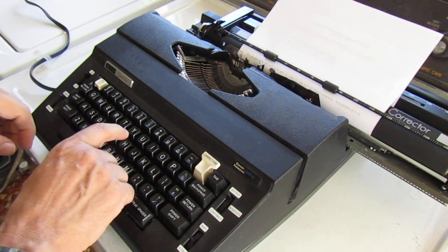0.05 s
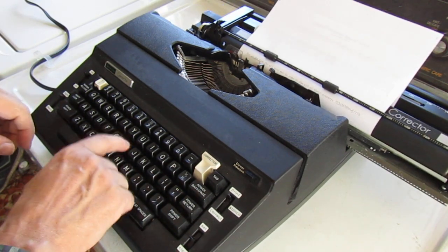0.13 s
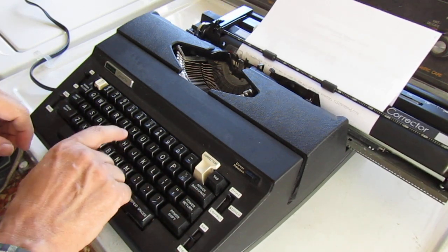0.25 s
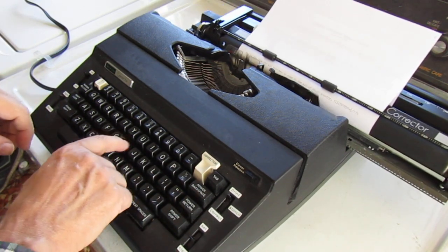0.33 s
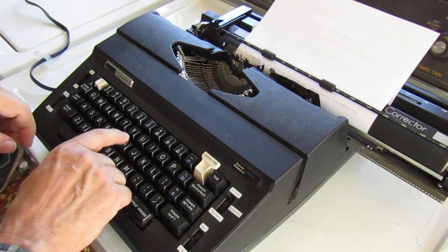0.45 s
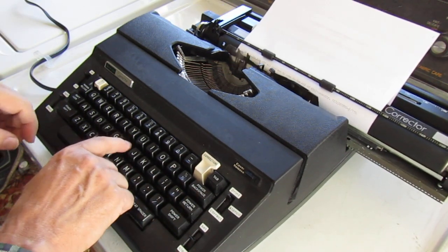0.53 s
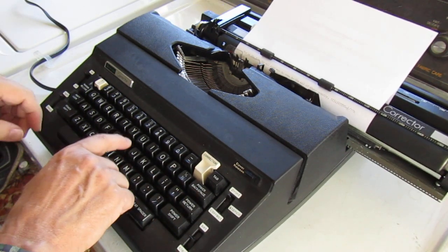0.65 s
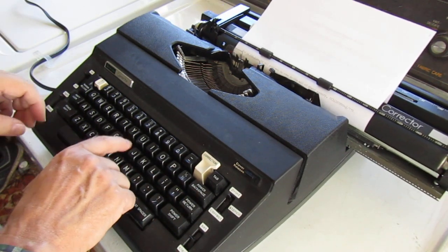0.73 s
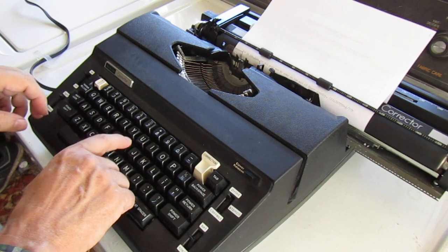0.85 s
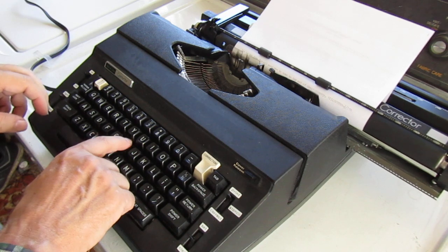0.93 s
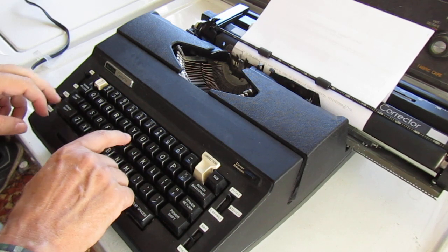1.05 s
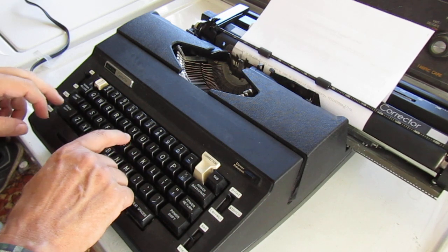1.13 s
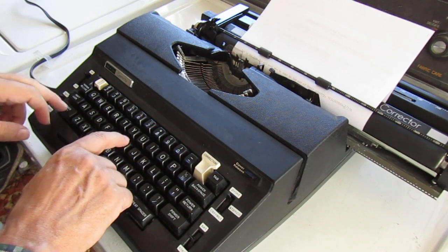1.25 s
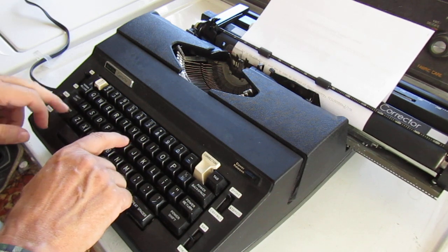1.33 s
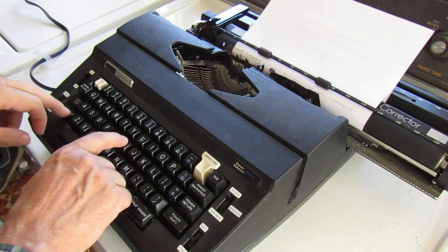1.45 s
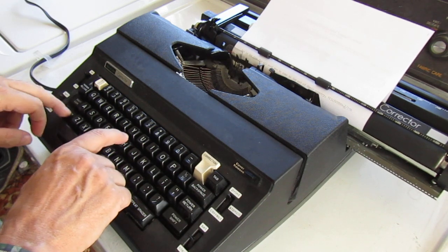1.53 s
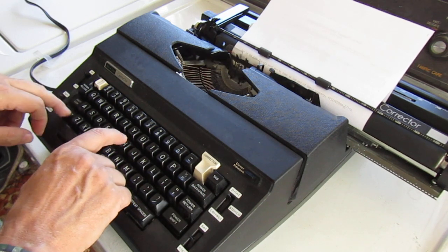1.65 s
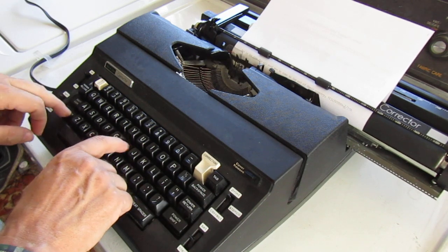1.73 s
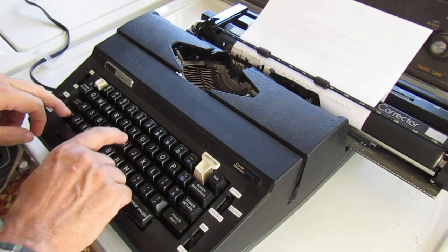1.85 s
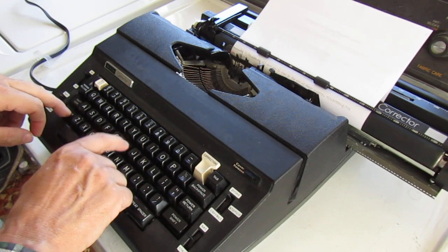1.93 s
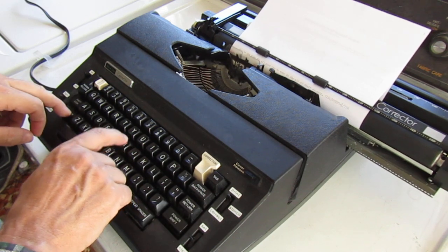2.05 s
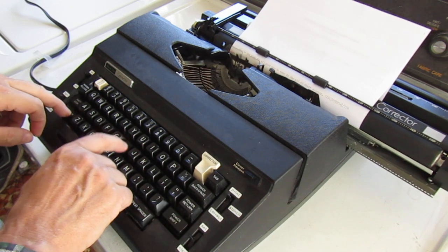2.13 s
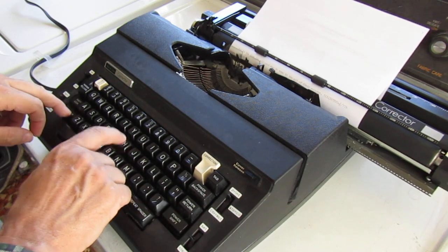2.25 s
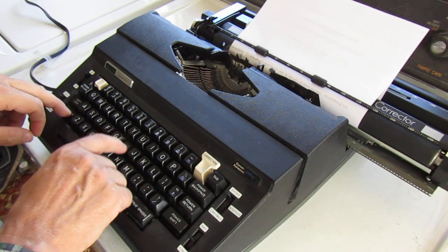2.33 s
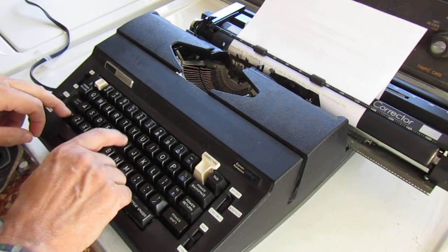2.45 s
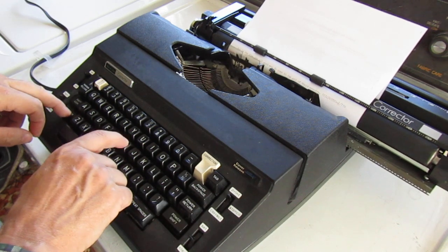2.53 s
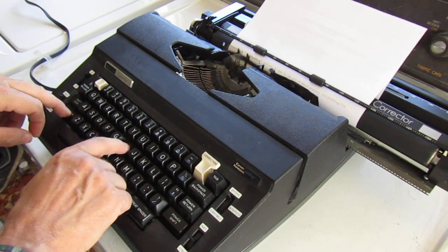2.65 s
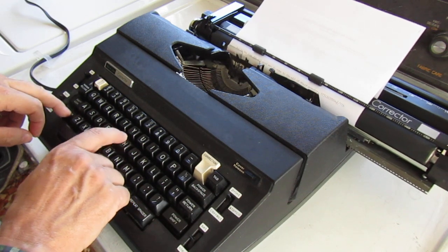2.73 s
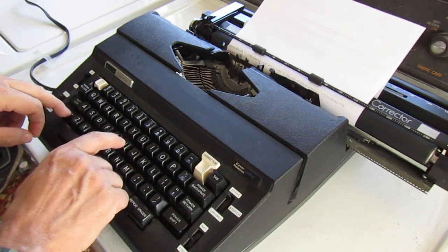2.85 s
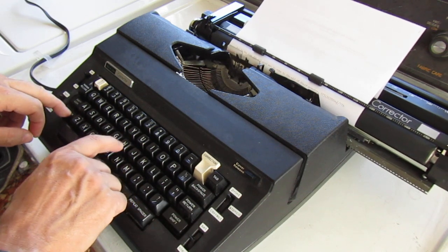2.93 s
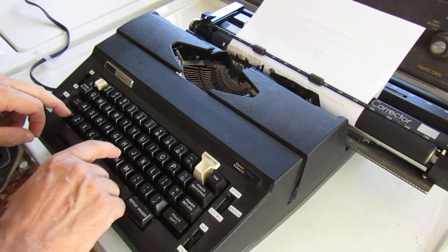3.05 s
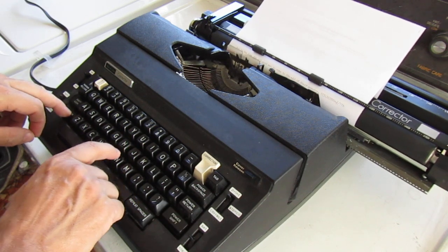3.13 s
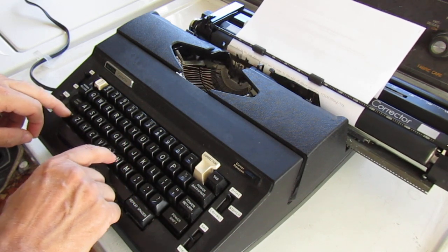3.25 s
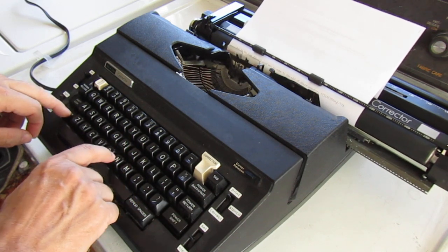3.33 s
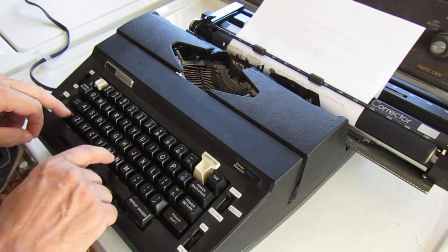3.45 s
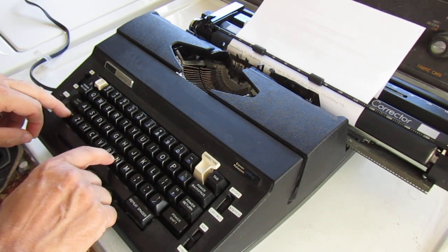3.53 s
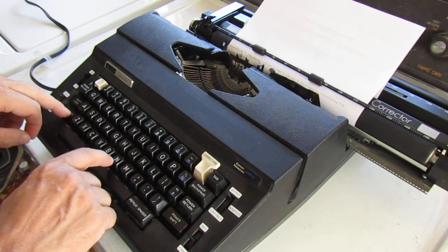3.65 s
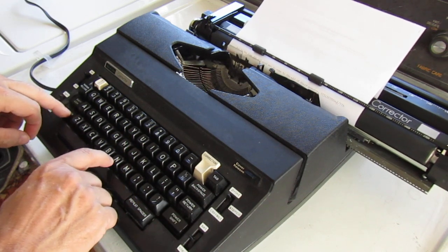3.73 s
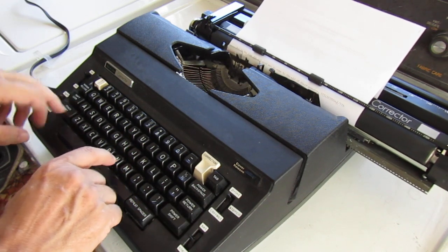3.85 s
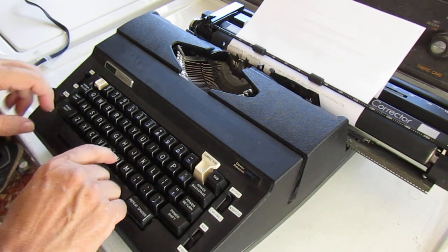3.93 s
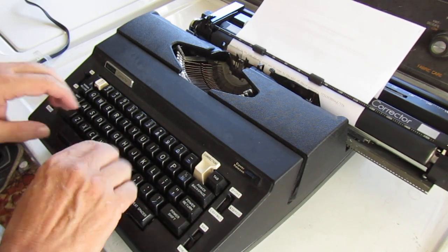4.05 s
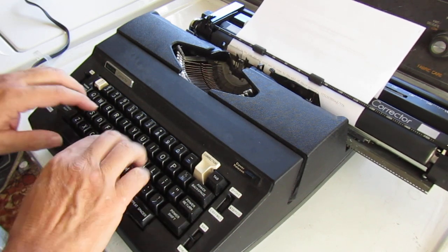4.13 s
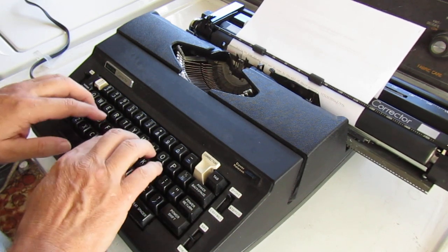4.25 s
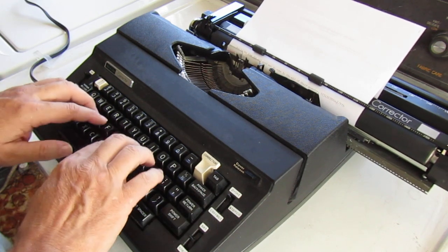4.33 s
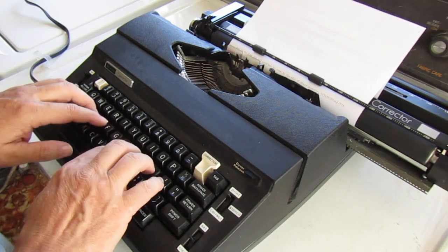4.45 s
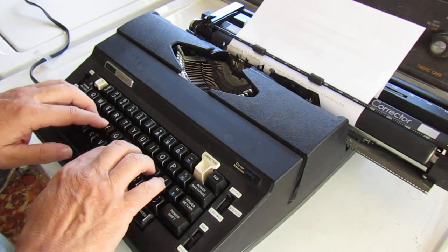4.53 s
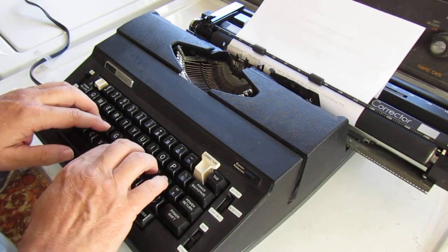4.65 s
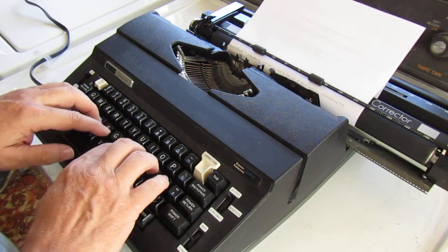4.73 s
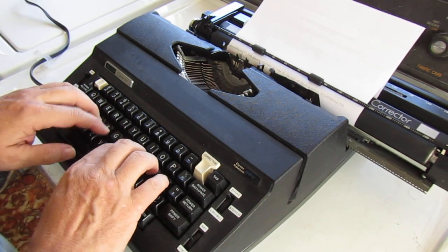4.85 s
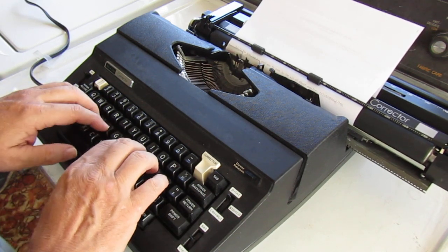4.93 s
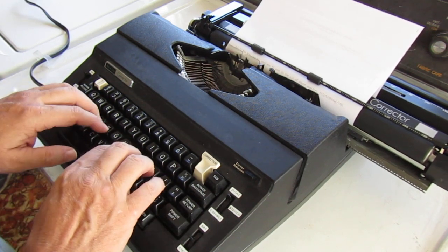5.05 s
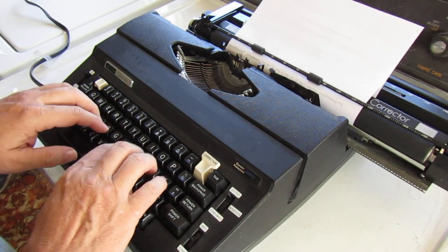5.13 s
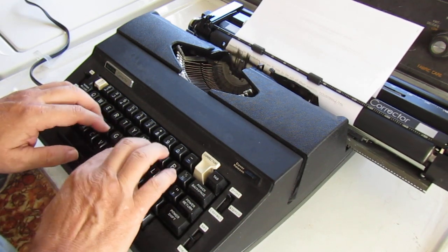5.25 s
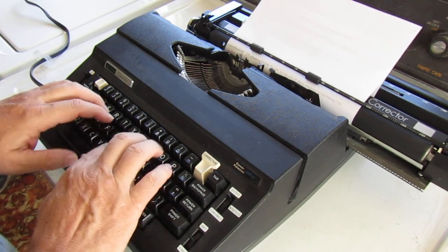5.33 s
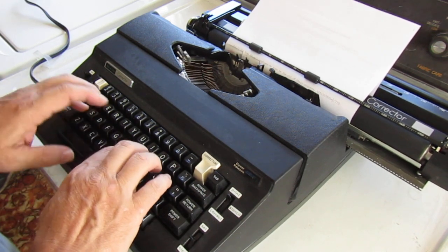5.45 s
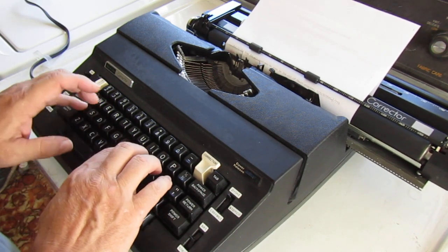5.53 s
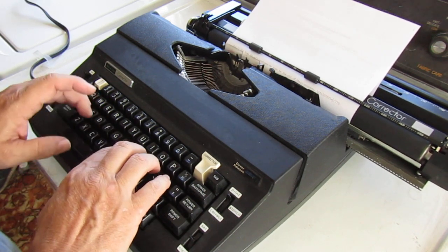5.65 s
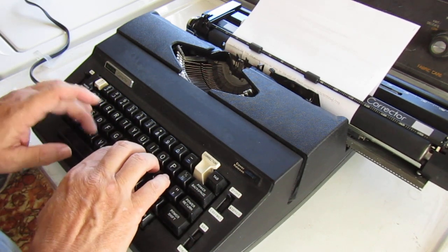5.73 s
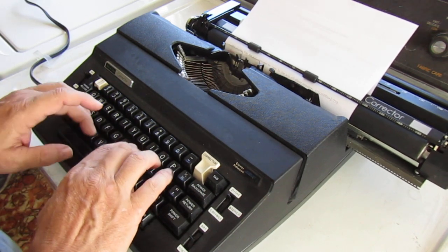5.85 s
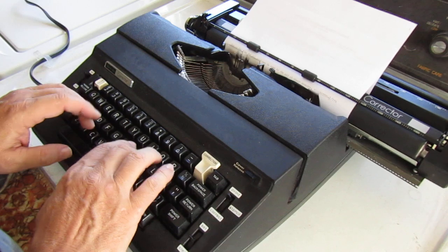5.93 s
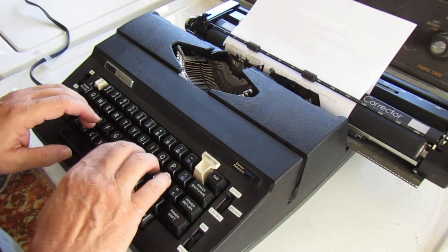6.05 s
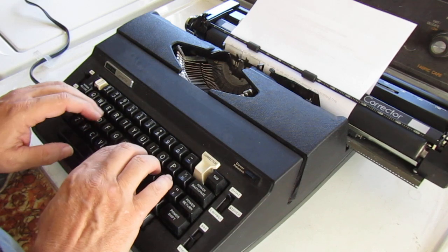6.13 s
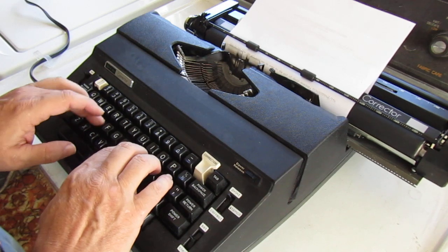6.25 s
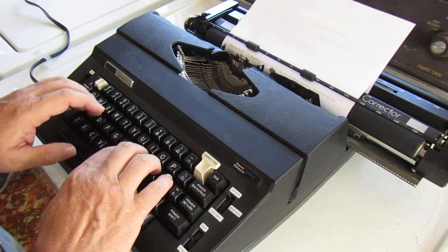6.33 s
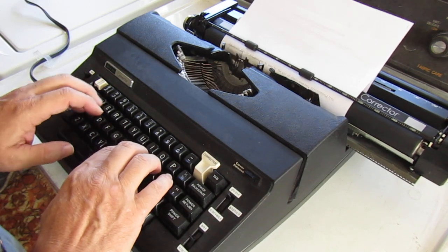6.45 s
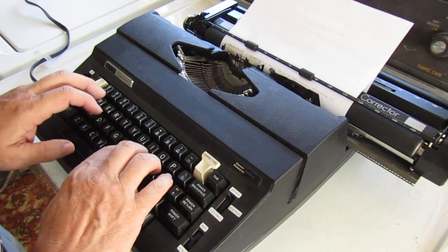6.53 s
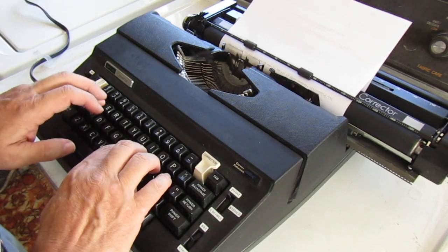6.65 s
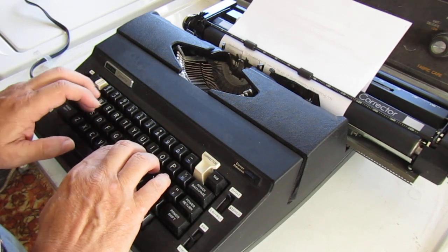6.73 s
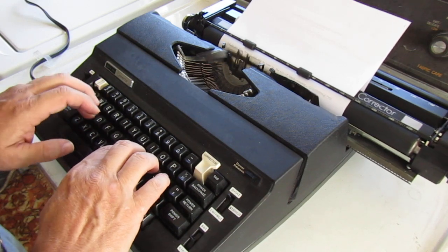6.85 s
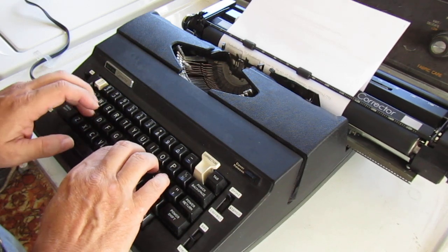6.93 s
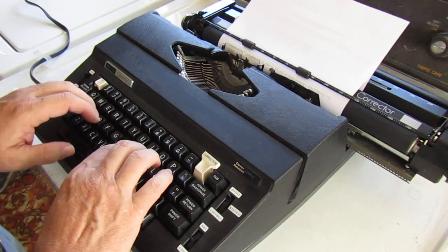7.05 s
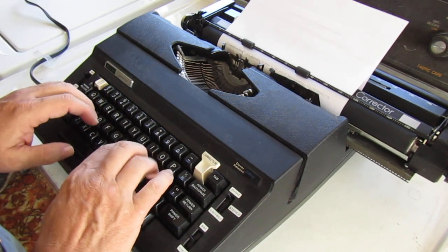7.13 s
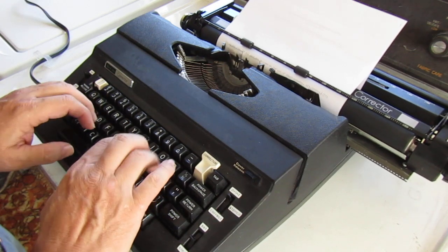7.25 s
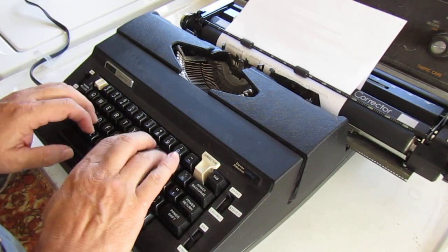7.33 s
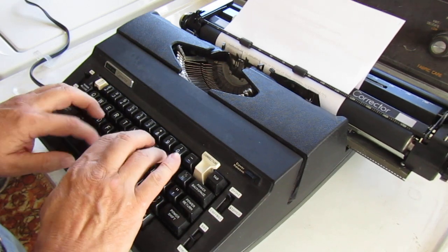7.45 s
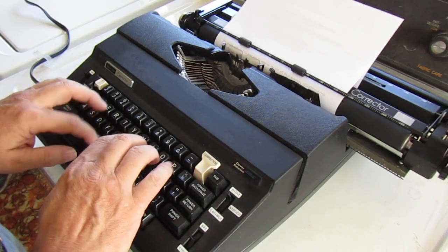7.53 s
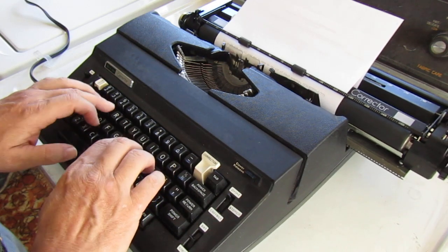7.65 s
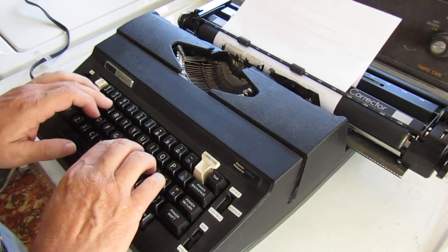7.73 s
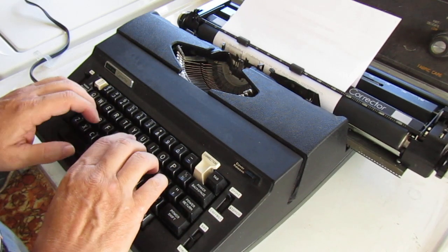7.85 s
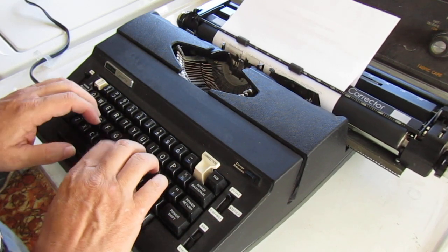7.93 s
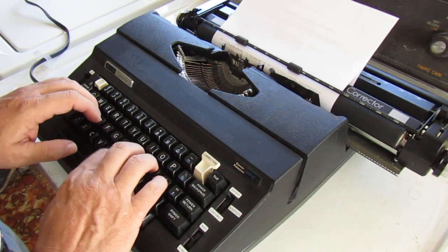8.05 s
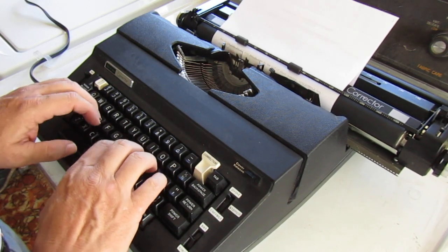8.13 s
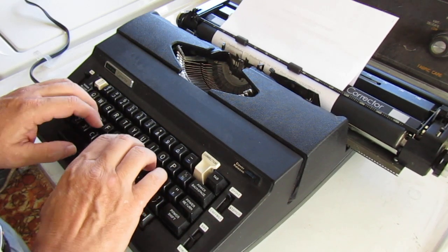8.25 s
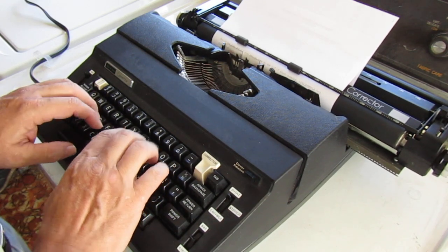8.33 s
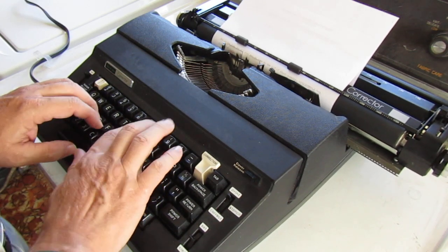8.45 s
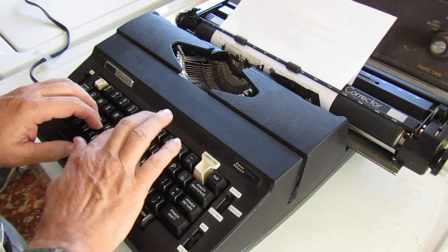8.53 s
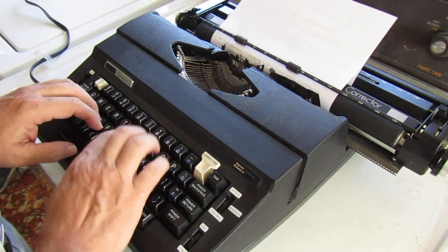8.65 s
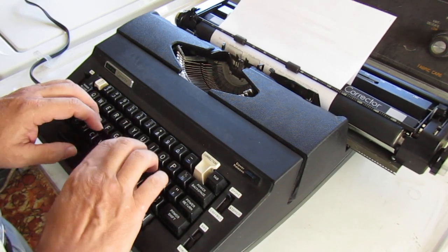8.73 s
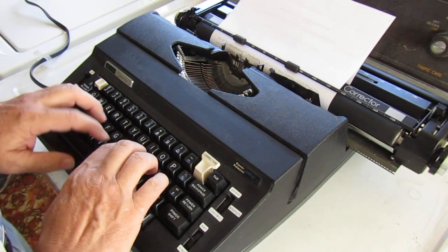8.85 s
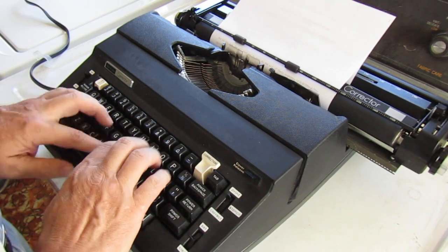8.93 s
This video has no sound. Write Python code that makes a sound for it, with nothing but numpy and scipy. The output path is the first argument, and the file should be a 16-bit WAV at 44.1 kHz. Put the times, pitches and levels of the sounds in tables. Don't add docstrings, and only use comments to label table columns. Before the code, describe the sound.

Bright, cracking type-bar slaps against a rubber roller dominate, recorded very near with a short dull room tail. Two groups of five even strokes come first, separated by light clunks; then a pause where a low motor hum and whir swells, with shift levers clicking. Faster, uneven typing follows, mixed with softer space-bar knocks, ending on small clicks. Hum ducks under the typing.

```python
import sys
import numpy as np
from scipy import signal
from scipy.fft import rfft, irfft
from scipy.io import wavfile
from scipy.ndimage import uniform_filter1d

SR = 44100
rng = np.random.default_rng(int(sys.argv[2]) if len(sys.argv) > 2 else 0)


def amplitude_ratio(level_db):
    exponent = np.asarray(level_db, float) / 20
    return 10 ** exponent


def store_pcm(level_fs):
    pcm = np.round(np.clip(level_fs, -1, 1) * 32767).astype(np.int16)
    wavfile.write(sys.argv[1], SR, np.atleast_2d(pcm).T)


N = 396900

# start in seconds, slap peak in dB, bite near 5.5 kHz in dB,
# edge near 9 kHz in dB, table thud in dB
STRIKES = [(0.2235, 6, 1.5, -1, -37.5), (0.411, 1.5, 5.5, -2.5, -40.5), (0.5967, -0.8, 4, -1, -45),
           (0.7569, -1, 2, 1.5, -43), (0.9694, -1.75, 2.5, 3, -42.5), (1.8219, 1, -4, 5.5, -44),
           (2.037, -2.5, -0.5, 5.5, -47.5), (2.2264, -3, -10, 7, -44.5), (2.4414, -2.5, 1, 6, -42),
           (2.71, -2.5, 1, 4.5, -44.5), (5.3234, 2, -1, -4.5, -39), (5.4305, -3, -1, -6.5, -42),
           (5.8553, -0.2, 3, -3, -40.5), (5.9603, -3.5, 5.5, -2.5, -46.5), (6.285, -3.5, 7, -3, -41.5),
           (6.4658, -4, 0.5, -1.5, -44.5), (6.681, -5.5, 1.5, -7, -40.5), (6.892, -3.5, 5, -4, -48),
           (7.2377, -4.5, 6, -6.5, -43), (7.4534, -6, 6.5, -7, -39.5), (7.5567, -4.5, 7, -1.5, -42.5),
           (7.7442, -5, 4, 0.5, -39), (8.0592, -2, 10.5, -1.5, -42.5), (8.5382, -3, 10, -3, -43.5)]
# start in seconds, level in dB,
# ringing part in Hz, ribbon lift in dB
CAMS = [(0.1966, -36.5, 7100, -18.5), (0.388, -25.5, 6900, -28), (0.5734, -29.5, 8350, -26.5),
        (0.7332, -29, 4550, -27.5), (0.9454, -30, 8370, -25.5), (1.7974, -26, 5000, -22.5),
        (2.013, -29.5, 7000, -25), (2.2017, -31, 9300, -26), (2.4195, -32.5, 8350, -27),
        (2.6868, -30, 7910, -27), (5.2981, -22.5, 8300, -22.5), (5.409, -27.5, 5400, -39),
        (5.8315, -30.5, 5380, -22.5), (5.9399, -37.5, 6150, -24), (6.2552, -29, 4740, -24.5),
        (6.4427, -34.5, 9310, -33), (6.655, -33.5, 6860, -31), (6.8671, -34.5, 6760, -29.5),
        (7.2146, -35, 7240, -29.5), (7.4228, -30.5, 6300, -26.5), (7.5335, -29, 8450, -30.5),
        (7.718, -32, 5640, -24.5), (8.0375, -31, 8300, -27.5), (8.5156, -31, 5400, -25)]
# frequency in Hz, level in dB per Hz
LEVERS = [(530, -50.5), (900, -24.5), (1360, -1.5), (3840, -5.5), (4120, -5), (4590, -3), (7640, -6),
          (8410, -6), (12700, -13), (15400, -25)]
# frequency in Hz, level in dB per Hz
CASING = [(60, -24), (150, -5.5), (195, -0.5), (270, -4.5), (320, 5), (380, -2.5), (600, -4.5),
          (1200, -8.5), (5000, -40)]
PARTS_DB = 1.5


def on_curve(curve, hz):
    points = np.array(curve)
    return np.interp(np.log(hz), np.log(points[:, 0]), points[:, 1])


def resonate(x, modes):
    y = np.zeros(len(x))
    for k, (hz, width, db) in enumerate(modes):
        r = np.exp(-np.pi * max(width, 5.) / SR)
        poles = [1, -2 * r * np.cos(2 * np.pi * hz / SR), r * r]
        y += (-1) ** k * amplitude_ratio(db) * (1 - r) * signal.lfilter([1, 0, -1], poles, x)
    return y


def add(out, x, s):
    i = int(s * SR)
    out[i:i + len(x)] += x[:N - i]


def walk(rate):
    hold = int(SR / rate)
    x = np.repeat(rng.standard_normal(N // hold + 1), hold)
    x = uniform_filter1d(uniform_filter1d(x, hold), hold)[:N]
    return x / np.std(x)


def chatter(spectrum, tilt_db, t60, rise, grit_db, colour_db, count=40, size=16384):
    t = np.arange(size) / SR
    hz = np.arange(size // 2 + 1) * SR / size + 1
    grit = np.repeat(rng.standard_normal(size // 32), 32)
    impacts = rng.standard_normal(size) * amplitude_ratio(grit_db * grit)
    swell = (1 - np.exp(-t / max(rise, 1e-4))) * amplitude_ratio(-60 * t / max(t60, .01))
    parts = np.interp(np.sqrt(hz / hz[-1]) * count, np.arange(count + 1), rng.standard_normal(count + 1))
    tilt = tilt_db * np.log2(np.clip(hz, 1000, 12000) / 5000)
    db = on_curve(spectrum, hz) + tilt + colour_db * parts
    cepstrum = irfft(np.log(amplitude_ratio(db)))
    cepstrum[1:size // 2] *= 2
    cepstrum[size // 2 + 1:] = 0
    sound = irfft(rfft(impacts * swell) * np.exp(rfft(cepstrum)))[:size // 2]
    return sound / np.sqrt(np.mean(amplitude_ratio(2 * db))) / np.std(impacts)


def tones(lines):
    t = np.arange(N) / SR
    out = np.zeros(N)
    for hz, db, wander_db in lines:
        level = amplitude_ratio(db - 1.5 + wander_db * walk(5.5))
        out += level * np.sin(2 * np.pi * (hz * t + rng.random()))
    return out


def motor():
    # frequency in Hz, level in dB, wander in dB
    hum = [(57, -18, 2), (186, -4, 1.5), (229, -13, 1.5), (240, 2.5, .4), (302, -10, 2), (348, -12, 2),
           (360, -4, 1), (421, -18, 2), (480, -10, 1.2), (496, -12, 2), (541, -14, 2), (600, -15, 1.5),
           (720, -19, 1.5), (11800, -26, .6)]
    # frequency in Hz, level
    # in dB, wander in dB
    belt = [(120, -4, .6), (131, 4, .5)]
    # frequency in Hz, level in dB per Hz
    whir_curve = [(15, -44), (30, -24), (70, -13.5), (150, -8.5), (300, -7), (500, -11.5), (700, -16.5),
                  (1300, -21.5), (2760, -30), (6000, -36.5), (11500, -42), (12700, -44), (15000, -46)]
    belt_turn_s, belt_seam_s, belt_top_db, belt_swing_db = 1.01, .06, 3.5, 14
    roller_turn_s, roller_rub_s = .975, .255
    squeak_hz, squeak_db, squeak_s = 10500, -21.5, .045
    flicker_db = .5
    t = np.arange(N) / SR

    hz = np.arange(N // 2 + 1) * SR / N + 1
    whir = irfft(rfft(rng.standard_normal(N)) * amplitude_ratio(on_curve(whir_curve, hz)), N)
    whir *= amplitude_ratio(1.2 + flicker_db * walk(6)) / np.std(whir)
    belt_turn = (t - belt_seam_s) / belt_turn_s % 1
    belt_db = belt_top_db - belt_swing_db * uniform_filter1d(belt_turn ** 0.9, size=3000)
    from_rub_s = (((t - roller_rub_s) / roller_turn_s + .5) % 1 - .5) * roller_turn_s
    squeak = resonate(rng.standard_normal(N), [(squeak_hz, 900, 12)])
    squeak *= amplitude_ratio(squeak_db) * np.exp(-(from_rub_s / squeak_s) ** 2)
    return squeak + tones(hum) + amplitude_ratio(belt_db) * tones(belt) + whir


def recorder_gain_db():
    # time in seconds, level in dB
    gain = [(0, -47.5), (.2, -47.5), (.3, -56), (1.1, -61), (1.68, -56), (2.01, -61), (3.01, -62.5),
            (3.85, -59.5), (4.06, -56.5), (4.69, -56), (5.04, -50), (5.3, -54.5), (6.12, -60.5),
            (7.72, -58.5), (8.07, -53.5), (8.2, -60), (8.57, -63.5), (9, -56)]
    return np.interp(np.arange(N) / SR, *np.transpose(gain))


def knocks():
    # start in seconds, level in dB, ringing part in Hz,
    # treble tilt in dB
    keys = [(0.1767, -55.5, 6830, -0.5), (0.1848, -55, 9300, 3), (0.1919, -42, 4670, -6),
            (0.2004, -14, 8660, 4), (.372, -56, 11000, 4.5), (0.5634, -59, 6030, -4),
            (1.776, -66, 12000, 5.5), (1.7928, -35.5, 4685, 4), (2.3813, -60, 7740, 9.5),
            (2.405, -40, 10500, 4.5), (2.4089, -52, 5470, 10.5), (2.6325, -54.5, 7680, 14),
            (2.6733, -41.5, 4580, 6), (5.2731, -52.5, 3740, 2), (5.285, -30.5, 9740, 6),
            (5.404, -42, 5030, 0), (5.8044, -51.5, 7330, 5.5), (5.823, -31.5, 8650, 3),
            (5.9264, -37, 6650, -1.5), (6.235, -58.5, 9000, -2), (6.397, -50, 8000, 5),
            (6.424, -42, 9500, 4), (6.631, -63, 8320, 6), (6.645, -38.5, 8660, 9), (6.8587, -43.5, 3940, 5),
            (7.1997, -58, 9630, -4), (7.2073, -37.5, 8600, 3), (7.388, -56, 9400, -1),
            (7.403, -41, 9150, 8), (7.528, -35, 8550, 7.5), (7.6982, -34.5, 1530, 10),
            (8.0345, -39, 8500, 3.5), (8.194, -61, 11500, 5), (8.4928, -46, 10370, 10)]
    # start in seconds, level in dB, ringing part in Hz
    returns = [(.247, -27, 9500), (.433, -30.5, 9500), (0.617, -32, 9500), (.779, -34.5, 9500),
               (.992, -36, 9500), (1.8553, -27, 6200), (1.862, -27, 6200), (1.9063, -39.5, 5230),
               (2.0698, -27, 10580), (2.122, -41.5, 9300), (2.2604, -26.5, 10100), (2.4757, -25, 9430),
               (2.5271, -38, 6150), (2.7425, -27, 9300), (2.8156, -48.5, 6200), (5.348, -28.5, 9640),
               (5.5028, -36, 6170), (5.878, -31.5, 9500), (6.0008, -33, 9270), (6.032, -56.5, 9200),
               (6.0487, -47, 5500), (6.309, -33, 9500), (6.488, -38, 9500), (6.701, -34, 9500),
               (6.7256, -33, 5600), (6.7576, -41.5, 9200), (6.9335, -28.5, 6400), (7.26, -34, 9500),
               (7.474, -41, 9700), (7.4962, -31.5, 5570), (7.5782, -29.5, 9600), (7.6198, -41.5, 9700),
               (7.7658, -36.5, 10600), (7.7929, -36, 9400), (7.823, -41.5, 6100), (7.8645, -43.5, 5970),
               (8.082, -32.5, 9600), (8.5602, -30.5, 10000)]
    # start in seconds, level in dB,
    # ringing part in Hz, treble tilt in dB, casing boom in dB
    shifts = [(1.1205, -59, 1130, -9, 4.5), (1.3522, -57, 4910, 4, -7.5), (1.4271, -41.5, 4500, -3, -11),
              (1.4525, -40, 6440, 4.5, -15.5), (1.4667, -30, 1350, 0.5, -8),
              (1.4904, -37, 1980, -3.5, -9.5), (3.9109, -45, 5240, -4, 0), (3.9167, -30, 5000, 7, -22),
              (3.9232, -35, 8200, 2, -13), (3.9265, -41, 4700, -2, -19.5), (3.9583, -31.5, 1410, -1.5, -7),
              (4.49, -68.5, 12900, 5.5, -26.5), (4.543, -65, 12500, 6, -20), (4.565, -67, 7500, 4, -20),
              (4.88, -46, 1450, -4, -6), (4.886, -45, 4480, 0, -11), (4.9259, -34.5, 3200, -1.5, -11),
              (4.947, -43.5, 7500, 3.5, 1), (4.989, -43.5, 4700, 1, -15), (4.996, -36, 1360, 0, -12),
              (5.0349, -43, 1570, -3.5, -7), (5.0419, -42, 2020, -7.5, -15)]
    # start in seconds, level in dB,
    # ringing part in Hz, treble tilt in dB, casing boom in dB
    spaces = [(5.6452, -46.5, 9730, 4, -29), (7.0383, -53, 4760, -1, -11), (7.0693, -41, 3240, 0, -10),
              (7.1356, -44, 4870, -0.5, -3), (7.1506, -45, 5200, -1.5, -21), (7.9567, -64, 2720, -9, -2),
              (7.9637, -57, 4820, -7, -11), (7.9692, -42.5, 1460, 0.5, -7), (7.9794, -41.5, 2780, -4, -8),
              (8.0054, -46.5, 8650, -3, -6), (8.7365, -48, 3090, -1.5, -13),
              (8.7911, -41, 2780, -3.5, -7.5), (8.8327, -56, 1520, -7, -7), (8.8592, -55, 4300, -6.5, 6.5),
              (8.8687, -45.5, 1440, 2, -9.5), (8.8801, -42.5, 2780, -2, -15),
              (8.9442, -51.5, 4010, -7, -10), (8.966, -60, 8500, 10, -30), (8.9797, -33.5, 8800, 3, -32),
              (8.994, -29.5, 8500, 3.5, -21)]

    def tilt(db):
        return 3.5 + 0.12 * (db + 31.0)

    def boom(base_db, db):
        return base_db - 0.31 * (db + 27.5)

    events = list(shifts) + list(spaces)
    for s, db, hz, _ in CAMS:
        events.append((s, db, hz, tilt(db), boom(-16, db)))
    for s, db, hz, tilt_db in keys:
        events.append((s, db, hz, tilt_db, boom(-13 - 0.36 * tilt_db, db)))
    for s, db, hz in returns:
        events.append((s, db, hz, tilt(db), boom(-17.5, db)))
    return events


def linkage():
    # start in seconds, level in dB
    latches = [(1.7934, -31.5), (4.9273, -42), (4.996, -37), (5.035, -40), (5.2857, -24), (5.3005, -24),
               (5.408, -28), (5.823, -32), (6.2548, -33), (6.425, -35), (6.644, -34), (7.4245, -33),
               (7.699, -31.5), (8.0375, -30), (8.5154, -29), (8.791, -44)]
    out = np.zeros(N)
    for s, db, part_hz, tilt_db, boom_db in knocks():
        steel = chatter(LEVERS, 0.96 * tilt_db, 0.11, rise=0.0017, grit_db=1.5, colour_db=PARTS_DB, size=8192)
        tick = chatter(LEVERS, .7 * tilt_db, .012, rise=.0001, grit_db=3.5, colour_db=2.5, size=2048)
        add(steel, 0.95 * tick, 0)
        ringing = resonate(steel, [(part_hz, 0.04 * part_hz, 4.5)])
        add(out, amplitude_ratio(db) * (steel + ringing), s)
        boom = chatter(CASING, 0, 0.22, rise=0.009, grit_db=-3.5, colour_db=2.9, count=90)
        add(out, amplitude_ratio(db + boom_db + 3.5) * boom, s)
    for s, db in latches:
        snap = chatter(LEVERS, 2.2, .02, rise=.0002, grit_db=0.5, colour_db=PARTS_DB, size=2048)
        add(out, amplitude_ratio(db) * snap, s)
    return out


def platen_slap(mid_db, bite_db, edge_db):
    # frequency in Hz, width in Hz, level in dB
    platen = [(2486, 270, 6.5), (3130, 280, 2), (3560, 490, 2.5), (4080, 1000, -5.5), (5010, 540, -4.5),
              (7100, 150, -10), (8300, 170, -4), (10105, 630, -11.5), (11100, 710, -18),
              (12700, 2000, -21.5)]
    # frequency in Hz, width in Hz, level in dB
    segment = [(2600, 90, -8.5), (2883, 58, -6.5), (3115, 30, -4), (3568, 82, -3.5), (3764, 26, -3),
               (4080, 33, -7.5), (4370, 54, -9), (4738, 90, -9), (5465, 55, -10), (8360, 65, -11.5)]
    # frequency in Hz, width in Hz, level in dB
    frame = [(356, 130, -19), (700, 680, -25.5), (1278, 90, -6), (1865, 230, -14)]
    colour = [(2600, 0), (3700, mid_db), (5500, bite_db), (8500, edge_db)]
    modes = []
    for hz, width, db in platen:
        detune, luck = rng.standard_normal(2)
        modes.append((hz * (1 + 0.009 * detune), width, db + 0.52 * luck + 1.3 * on_curve(colour, hz)))
    blow = np.zeros(2000)
    blow[[0, int(.00033 * SR), int(.004 * SR), int(.0065 * SR)]] = 0.21, 1.0, 0.18, 0.17
    blow = uniform_filter1d(np.roll(blow, shift=44), size=2)
    bright = resonate(blow, modes) + amplitude_ratio(4.0) * resonate(blow, segment)
    highpass = signal.butter(5, 2530, "high", fs=SR, output="sos")
    slap = signal.sosfiltfilt(highpass, bright) + resonate(blow, frame)
    return slap / np.abs(slap).max()


def type_bars():
    # frequency in Hz, level in dB per Hz
    ring_curve = [(150, -43.5), (250, -21), (680, -17), (1580, -13.5), (1950, -4.5), (2990, -10.5),
                  (3950, 1), (5200, -8), (9670, -11), (13400, -22), (15400, -34)]
    # frequency in Hz, level in dB per Hz
    shudder_curve = [(88, -36.5), (150, -11), (332, -4.5), (927, -12), (1370, -2.5), (2350, -3.5),
                     (3820, 0.5), (7670, -2.5), (9490, -2.5), (10900, -8.5), (12700, -11.5), (15400, -23)]
    # frequency in Hz, width in Hz, level in dB
    ribbon_fork = (11000, 700, 7)
    out = np.zeros(N)
    for letter, (strike, cam) in enumerate(zip(STRIKES, CAMS)):
        s, db, bite_db, edge_db, _ = strike
        lift_db = cam[-1]
        mid_db = 3 - 0.2 * letter
        treble_db = -1 - 0.41 * letter
        add(out, amplitude_ratio(db + 0.5) * platen_slap(mid_db, bite_db, edge_db), s - .001)
        ring = chatter(ring_curve, 0.17 * (treble_db + 12.0), 0.045, rise=0.0012, grit_db=1.5,
                       colour_db=PARTS_DB, count=90, size=8192)
        add(out, amplitude_ratio(db - 12.5) * ring, s)
        shudder = chatter(shudder_curve, 0.28 * (treble_db + 8.0), 0.21, rise=0.0085, grit_db=1.5,
                          colour_db=PARTS_DB, count=90)
        add(out, amplitude_ratio(-25) * shudder, s)
        lift = chatter(LEVERS, 0.96, 0.037, rise=0.001, grit_db=2.0, colour_db=PARTS_DB, size=8192)
        add(out, amplitude_ratio(lift_db - 1.5) * (lift + resonate(lift, [ribbon_fork])), s - .005)
    return out


def limiter_db():
    duck_db, duck_s = -5.5, 0.054
    t = np.arange(8000) / SR
    out = np.zeros(N)
    for row in STRIKES:
        add(out, duck_db * np.exp(-(t / duck_s) ** 2), row[0] + 0.0043)
    return uniform_filter1d(out, size=200)


def thud(db):
    # frequency in Hz, level in dB, 60 dB decay in seconds
    boards = [(54, -25, .2), (62, -5.5, .3), (70, -5, .25), (79, -3, 0.49), (94.8, -8, 0.44)]
    t = np.arange(16000) / SR
    boom = np.zeros(len(t))
    for hz, mode_db, t60 in boards:
        detune, phase, luck = rng.standard_normal(3)
        decay = amplitude_ratio(mode_db + 1.1 * luck - 60 * t / t60)
        boom += decay * np.sin(2 * np.pi * hz * (1 + 0.036 * detune) * t + .8 * phase)
    return amplitude_ratio(db) * boom * (1 - np.exp(-(t / 0.012) ** 2))


def table_top():
    # start in seconds, level in dB
    jolts = [
        (1.462, -45),
        (1.801, -50.5),
        (3.958, -46),
        (4.932, -43),
        (5.0, -40.5),
        (6.1, -59),
        (7.139, -48),
        (7.979, -54.5),
        (8.789, -70),
        (8.88, -50),
    ]
    steps = [(row[0] + 0.045, row[-1]) for row in STRIKES]
    out = np.zeros(N)
    for s, db in list(jolts) + steps:
        add(out, thud(db), s)
        rumble = chatter(CASING, 0, 0.26, rise=0.034, grit_db=1.5, colour_db=2.9, count=90)
        add(out, amplitude_ratio(db + 7.5) * rumble, s)
    return out


def room(x):
    t60_s, tail_db = 0.21, -18.5
    t = np.arange(16000) / SR
    tail = rng.standard_normal(len(t)) * amplitude_ratio(-60 * t / t60_s) * (1 - np.exp(-t / 0.0057))
    tail = signal.lfilter([1], [1, -.75], tail)
    tail /= np.sqrt(np.sum(tail ** 2))
    return x + amplitude_ratio(tail_db) * signal.fftconvolve(x, tail)[:N]


def scene():
    machine = room(type_bars() + linkage())
    background = table_top() + amplitude_ratio(recorder_gain_db()) * motor()
    return (machine + amplitude_ratio(limiter_db()) * background)[None]


def drop_weak(x):
    weak_hz, weak_db = 12750, -108.5
    hz, _, z = signal.stft(x, SR, nperseg=2048)
    bands = np.abs(z[0, :-1].reshape(-1, 8, z.shape[-1])) ** 2
    power = np.repeat(np.mean(bands, axis=1), 8, axis=0)
    z[0, :-1] *= (power > amplitude_ratio(2 * weak_db)) | (hz[:-1, None] < weak_hz)
    return signal.istft(z, SR)[1][:, :N]


def low_pass(x):
    return signal.sosfilt(signal.butter(12, 15330, fs=SR, output="sos"), x)


def record(dry):
    ported = dry - .8 * resonate(dry[0], [(7900, 130, 1.3)])
    lowpass = signal.ellip(7, .5, 50, 14950, fs=SR, output="sos")
    clipped = np.clip(signal.sosfilt(lowpass, ported), -1, 1)
    return low_pass(drop_weak(clipped))


dry = scene()
out = record(dry)
store_pcm(out)
```